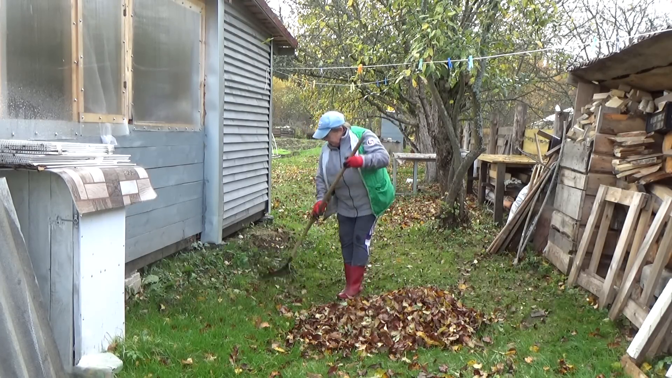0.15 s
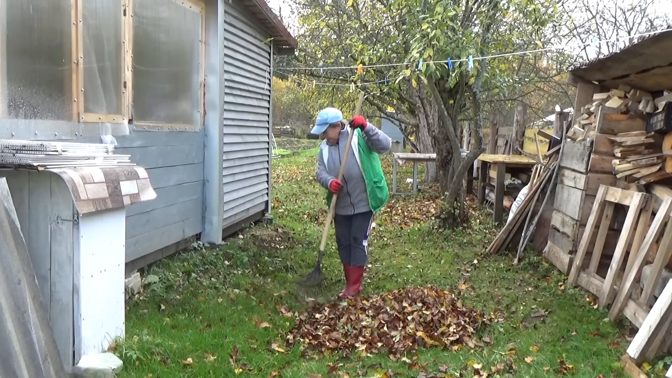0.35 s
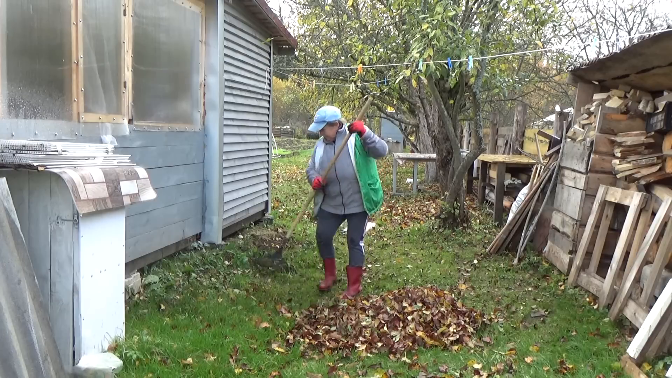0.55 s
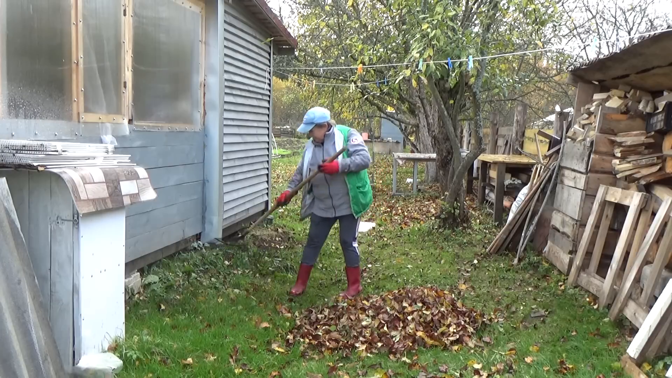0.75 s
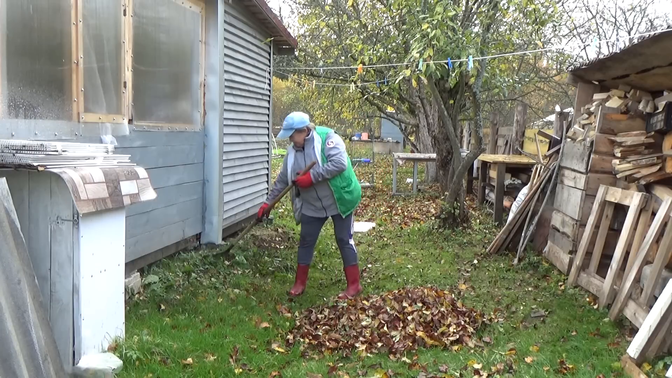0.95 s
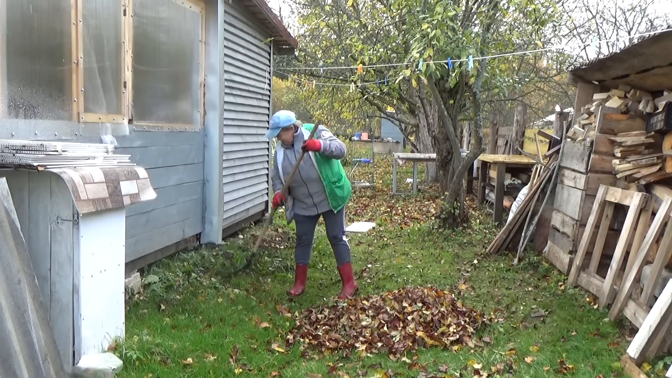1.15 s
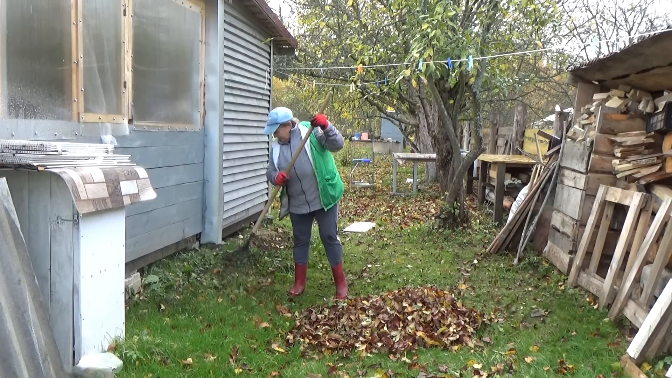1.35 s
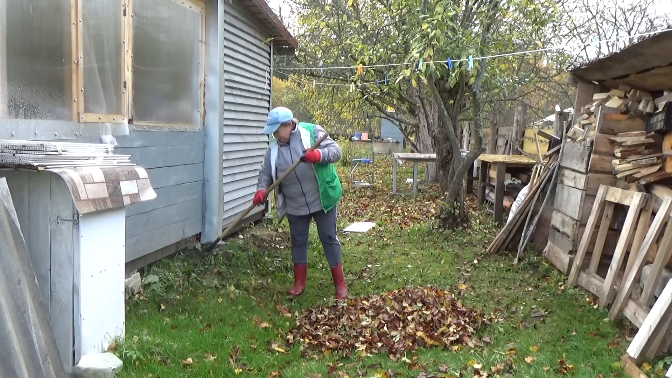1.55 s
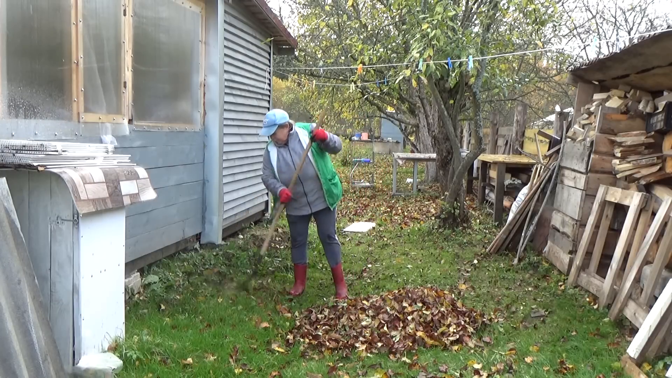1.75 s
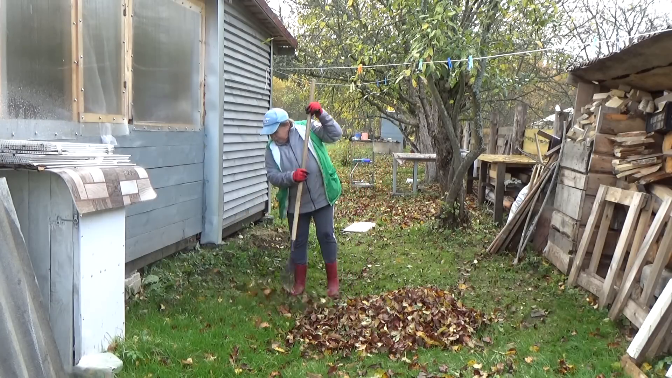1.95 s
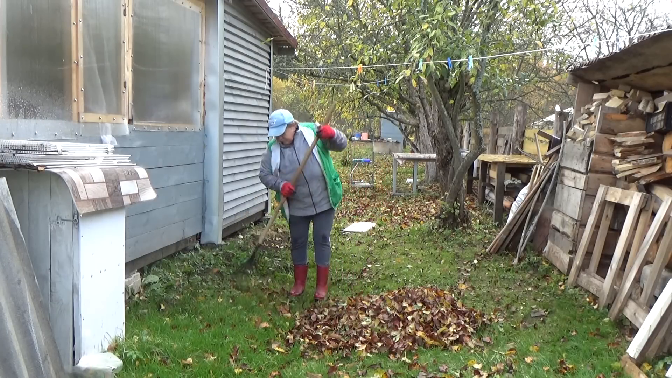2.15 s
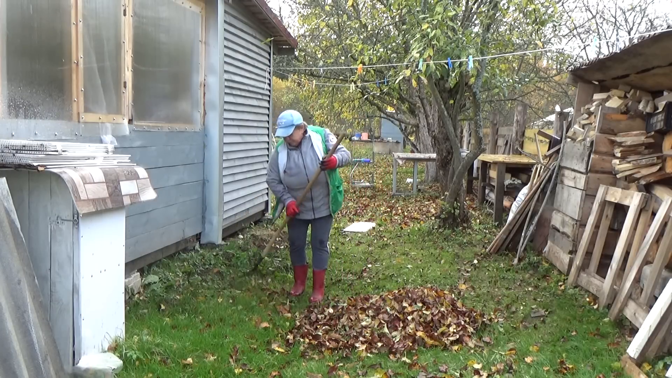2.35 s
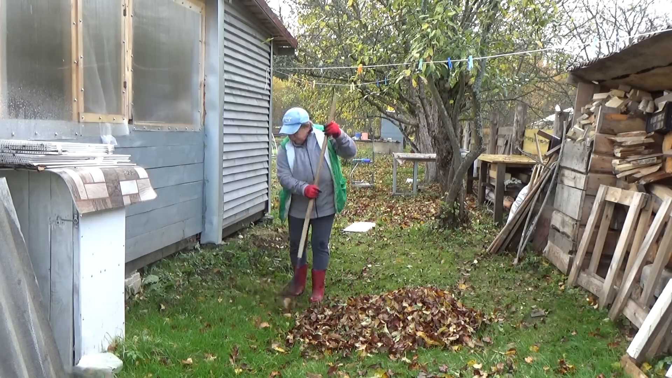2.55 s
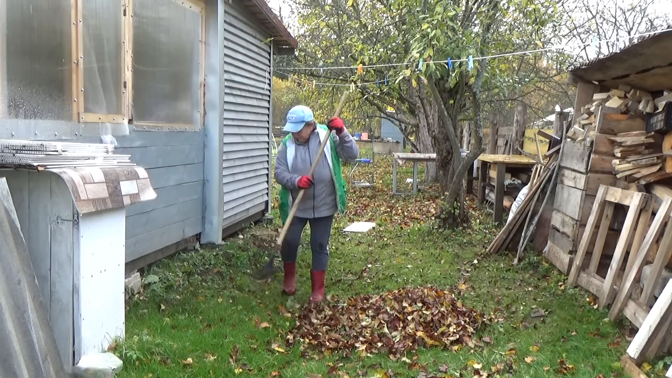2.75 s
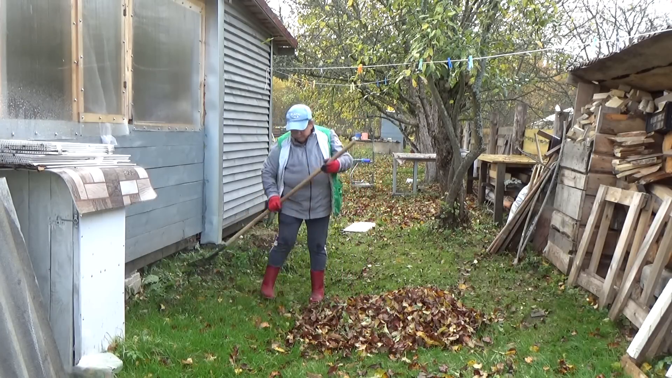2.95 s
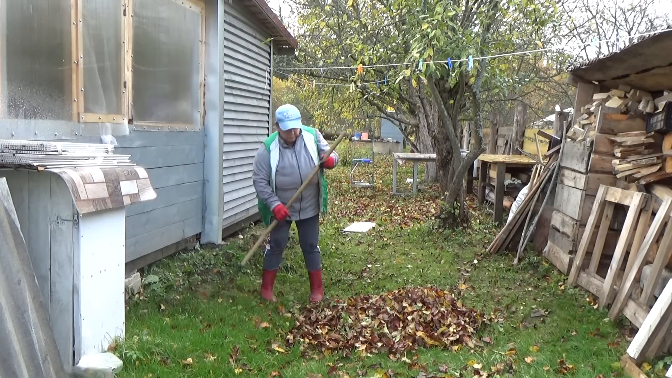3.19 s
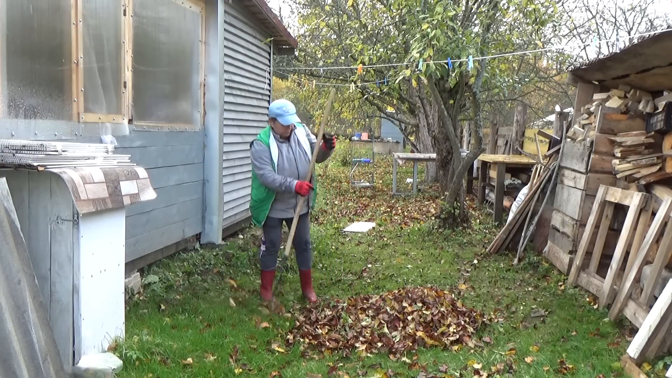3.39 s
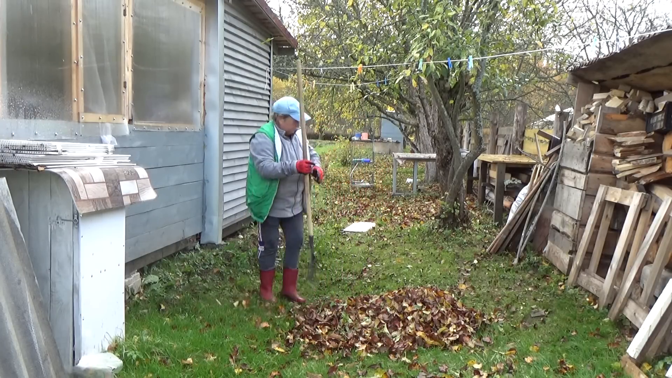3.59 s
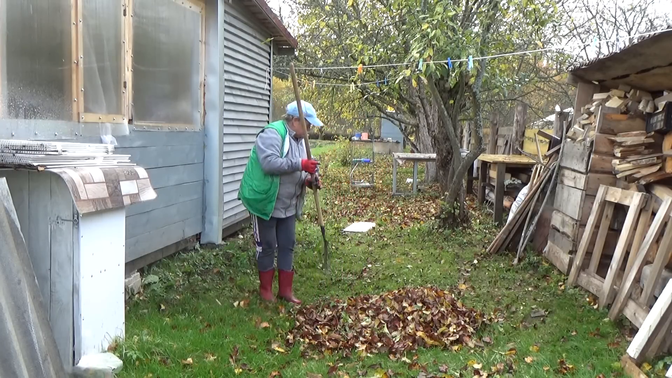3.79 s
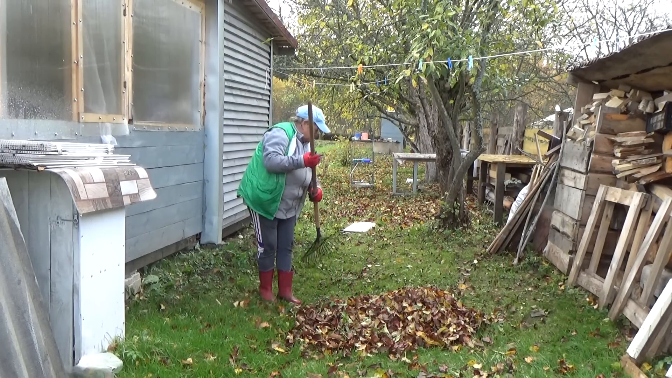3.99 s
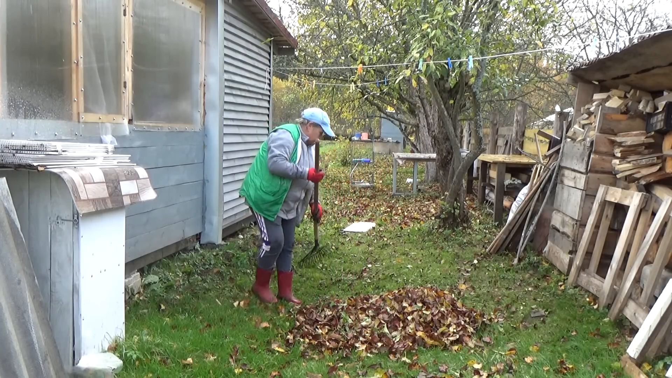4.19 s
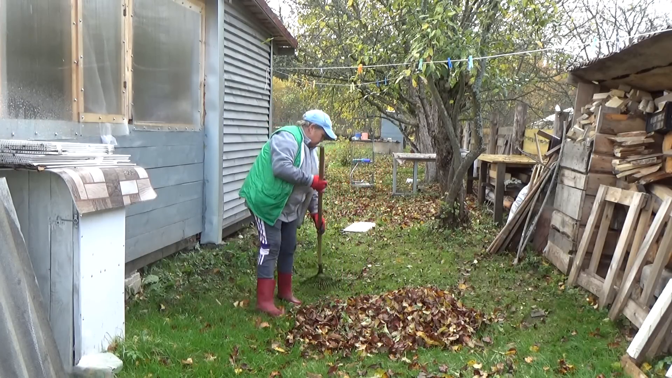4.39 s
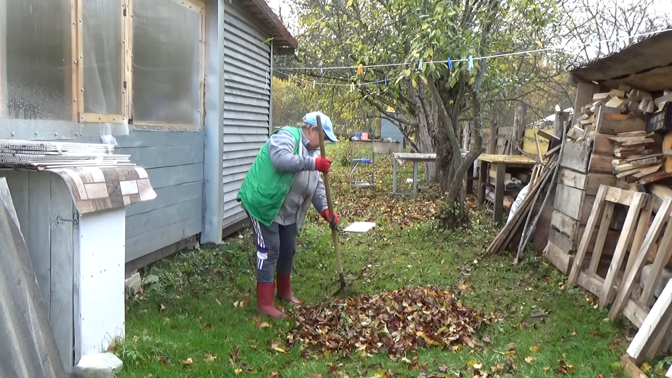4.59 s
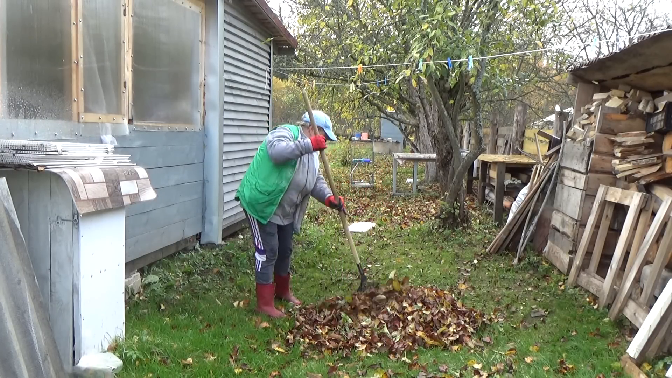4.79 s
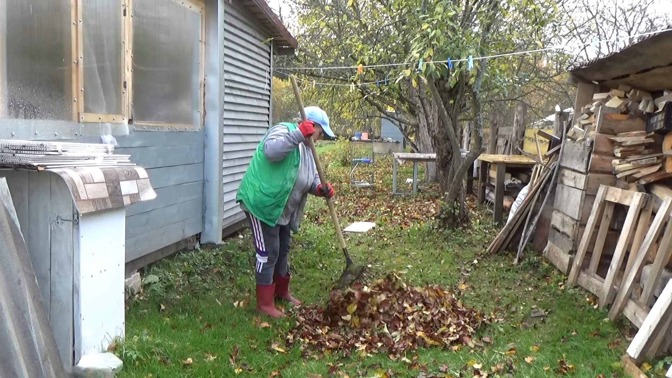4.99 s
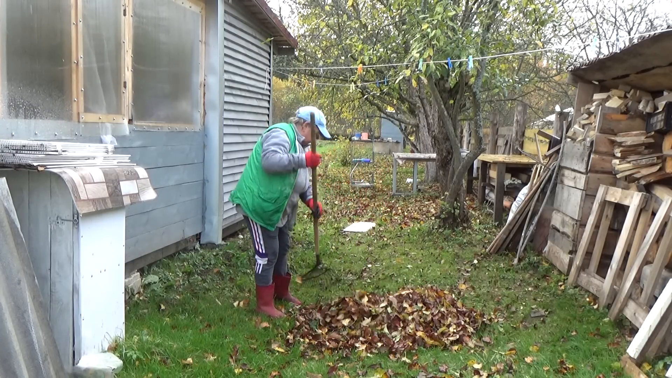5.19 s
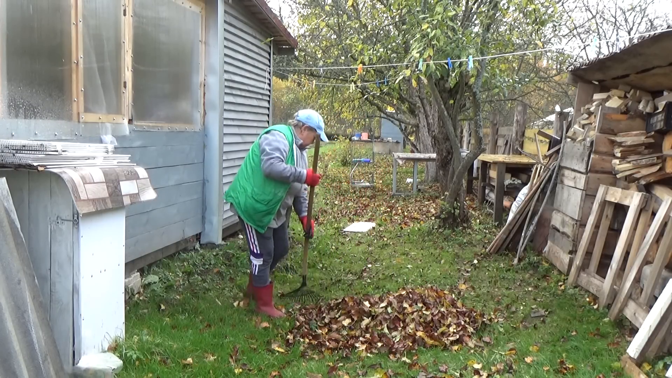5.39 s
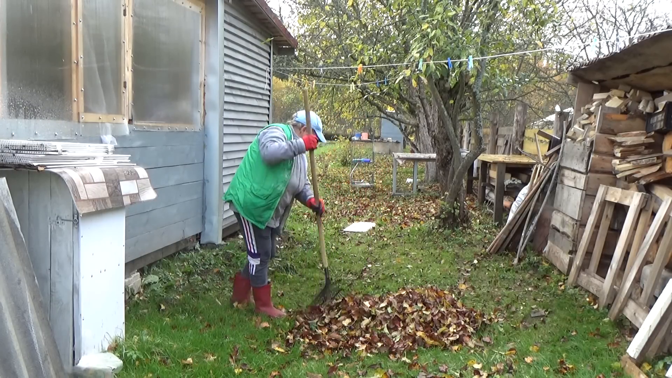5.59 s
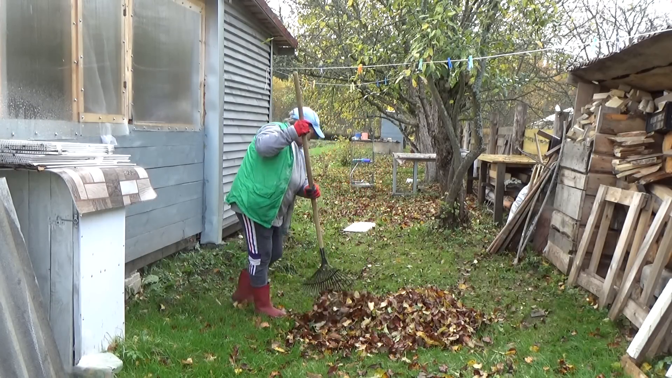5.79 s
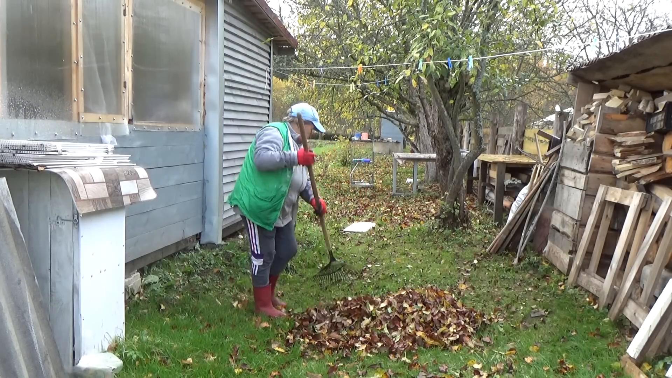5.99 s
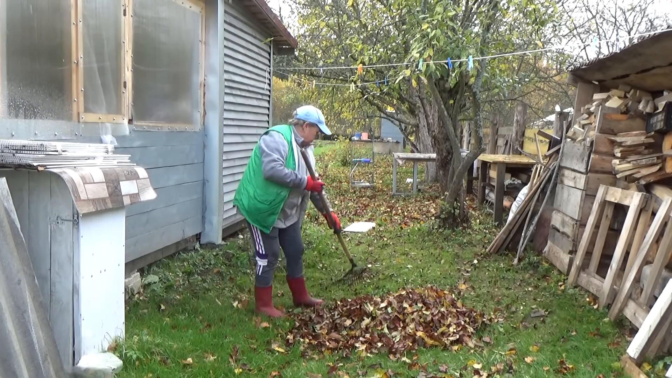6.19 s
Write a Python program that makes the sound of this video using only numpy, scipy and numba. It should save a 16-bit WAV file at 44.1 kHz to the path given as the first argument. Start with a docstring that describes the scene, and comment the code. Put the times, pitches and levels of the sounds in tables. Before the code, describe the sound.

A very faint, steady outdoor hush underlies close, dry raking, with a slight short echo from nearby wall and wood. At about 0.1 s the loudest stroke swells and rips through crisp leaves, tines rasping upward in pitch with a clack at 0.2. Small brushes and dull knocks follow. Softer pulls come at 1.0, 1.7, 2.4 and 3.15 s, each a quick crackling scrape with grass tearing beneath; springy tine rings flick out around 1.3 and 1.7, and a sharp clack with a soil thud lands at 1.7. From 3.5 to 4.2 only faint rustles and settling ticks remain. At 4.45 a longer scrape builds, with hard clacks around 4.6 and muffled leaf crunch onto a heap. Light rustling continues near 5.0, then an abrupt last pull at 5.4 clatters and crunches, fading into a soft brush by 6.0.

```python
"""Under faint outdoor air a fan rake takes a first, loudest pull through dry leaves and grass near a wall and woodpile.
Four more pulls follow at short intervals, with light brushes over the lawn and dull knocks of boots and rake between.
After a longer gap come the last two pulls, around which leaves crunch onto a heap.
The leaves are trains of tiny snaps, the turf a bumpy crackle; bending tines are gliding resonances, mostly rising.
Short volleys of clicks make the tines clack as they land, and ringing bursts as they spring free."""
import sys
import numpy as np
from scipy import signal
from scipy.fft import rfft, irfft, next_fast_len
from scipy.io import wavfile
from scipy.ndimage import map_coordinates
from numba import njit

SR = 44100
rng = np.random.default_rng(int(sys.argv[2]) if len(sys.argv) > 2 else 0)


def digitize_waveform(pressure):
    """Quantize a signal to 16-bit integers and store it at the path in sys.argv[1].

    Rows of a 2-D input are taken as channels; values are limited to [-1, 1].
    """
    field = np.atleast_2d(pressure).T
    bounded = np.clip(field, -1, 1)
    quanta = np.round(bounded * 32767).astype(np.int16)
    wavfile.write(sys.argv[1], SR, quanta)


N = 275184

# Colour of dry leaves. Each row: frequency in Hz, relative level in dB.
LEAF_COLOUR = [(300, -41), (900, -13), (1600, -6.5), (2400, -3.5), (3500, -1.5), (5000, 0), (6300, 0),
               (7400, -3), (9800, -3.5), (12000, -9), (14000, -16), (16000, -24)]


def amp(db):
    """Decibels to gain."""
    return 10 ** (np.asarray(db) / 20)


def unit(x):
    """Scaled to rms 1."""
    return x / np.sqrt(np.mean(x ** 2) + 1e-20)


def along(points, hz):
    """(Hz, value) points read on a log frequency axis."""
    point_hz, values = np.transpose(points)
    return np.interp(np.log(hz + 1), np.log(point_hz + 1), values)


def wobble(rate):
    """A smooth random curve, rate knots a second."""
    knots = rng.standard_normal(int(N * rate / SR) + 4)
    return map_coordinates(knots, [np.arange(N) * rate / SR])


def filtered(x, response):
    """The signal multiplied by a response of frequency."""
    m = next_fast_len(N + SR // 2)
    return irfft(rfft(x, m) * response(np.fft.rfftfreq(m, 1 / SR)), m)[..., :N]


def coloured(x, spectrum):
    """The signal through a (Hz, dB) spectrum that keeps the power of white noise."""
    return filtered(x, lambda hz: unit(amp(along(spectrum, hz))))


def stereo(pair, alike):
    """Two independent signals become left and right, as alike in each band as the (Hz, likeness) points say."""
    def mid_and_side_gains(hz):
        turn = np.arccos(np.clip(along(alike, hz), -1, 1)) / 2
        return np.array([np.cos(turn), np.sin(turn)])

    mid, side = filtered(pair, mid_and_side_gains)
    return np.array([mid + side, mid - side])


def scattered(x, life=.002, block=512):
    """Each snap arrives by many short paths through the litter, life seconds long; the paths keep changing."""
    count = N // block + 1
    pieces = np.pad(x, ((0, 0), (0, count * block - N))).reshape(2, count, block)
    paths = rng.standard_normal((2, count, block)) * np.exp(-np.arange(block) / (SR * life))
    gains = rfft(paths, 2 * block)
    # only the phase of the paths is used, so they smear without colouring
    heard = irfft(rfft(pieces, 2 * block) * gains / np.abs(gains)).reshape(2, count, 2, block)
    head = heard[:, :, 0].reshape(2, -1)
    tail = heard[:, :, 1].reshape(2, -1)
    # the tail of each block overlaps the next block
    return (head + np.pad(tail, ((0, 0), (block, 0)))[:, :-block])[:, :N]


def crackle(rate, spread_db, hiss):
    """Two trains of tiny snaps of uneven size, rate a second, merged with a hiss; rms 1."""
    sizes = amp(spread_db * np.clip(rng.standard_normal((2, N)), -2, 2))
    sizes = sizes * rng.choice([-1, 1], (2, N))
    snaps = sizes * (rng.random((2, N)) < rate / SR) / np.sqrt(rate)
    return unit(unit(scattered(snaps)) + hiss * rng.standard_normal((2, N)))


def snags(rate, life, size):
    """A tine catches, lets go and the leaves settle: random jumps that die away, over a steady level; mean 1."""
    kicks = (rng.random(N) < rate / SR) * rng.uniform(0.18, 1, N)
    jumps = signal.lfilter([1], [1, -np.exp(-1 / (SR * life))], kicks)
    return (1 + size * jumps) / (1 + size * jumps.mean())


def bursts(times, levels_db, hold, t60):
    """An envelope that jumps at each time, holds while the tines arrive, and dies by 60 dB in t60 seconds."""
    out, t = np.zeros(N + SR), np.arange(SR // 4) / SR
    for start, db in zip(times, levels_db):
        out[round(start * SR):][:len(t)] += amp(db - 60 * np.maximum(t - hold, 0) / t60)
    return out[:N]


def swell(start, attack, hold, fall_db_per_s):
    """Pressure builds a little faster than linearly, holds and lets go; top 1."""
    attack_power = 1.17
    t = np.arange(N) / SR - start
    build = np.clip(t / attack, 0, 1) ** attack_power
    return build * amp(-fall_db_per_s * np.maximum(t - attack - hold, 0))


def air():
    """Faint, nearly steady outdoor hush: coloured noise."""
    # Colour of the hush. Each row: frequency in Hz, relative level in dB.
    hush_colour = [(20, -4.5), (35, -9), (50, -5.5), (75, -2), (150, -4.5), (400, -3.5), (1000, -2.5),
                   (3000, -5.5), (6000, -10), (10000, -11), (13000, -19), (16000, -20)]
    level_db = -68.0 + 0.16 * wobble(1.77)
    return amp(level_db) * coloured(rng.standard_normal((2, N)), hush_colour)


def yard(x):
    """Wall and woodpile scatter a short answer: a noise tail that dies at its own pace in each band."""
    # Decay of the answer. Each row: frequency in Hz, time to fall 60 dB in seconds.
    decay_times = [(150, 0.33), (2000, 0.12), (12000, 0.096)]
    hz, t, noise = signal.stft(rng.standard_normal(SR // 3), SR, nperseg=256)
    fade = amp(-60 * t / along(decay_times, hz)[:, None])
    tail = signal.istft(noise * fade, SR, nperseg=256)[1]
    tail = np.pad(tail / np.linalg.norm(tail), (SR // 200, 0))  # 5 ms later than the rake
    return signal.fftconvolve(x, tail[None], axes=1)[:, :N]


def knocks():
    """Boots and rake knock dully on the soil, which swallows each knock within a few cycles."""
    # Knocks on soft ground. Each row: start in seconds, pitch in Hz, envelope peak in dB.
    soil_knocks = [(0.065, 1400, -49.5), (.272, 85, -61), (0.768, 342, -58), (0.788, 1900, -54),
                   (1.713, 390, -48), (2.549, 430, -49.5), (4.705, 520, -46), (3.04, 45.3, -76),
                   (5.569, 90, -61)]
    out, t = np.zeros(N + SR), np.arange(SR // 4) / SR
    for start, hz, db in soil_knocks:
        life = 0.0011 + 1.1 / hz
        age = 2 * t / life
        out[round(start * SR):][:len(t)] += amp(db) * np.sin(2 * np.pi * hz * t) * age * np.exp(1 - age)
    return out[:N]


def flicks():
    """A snagged tine lets go and rings briefly: short snaps excite the tine resonances."""
    # Tines springing free. Each row: start in seconds, relative level in dB.
    releases = [(0.5935, -57), (0.6334, -47.5), (0.8372, -54.5), (0.985, -50), (1.32, -32.5), (1.3517, -39),
                (1.3754, -45), (1.518, -55), (1.682, -31.5), (2.0488, -46.5), (2.174, -50), (2.646, -44),
                (2.7831, -54), (3.8023, -65)]
    # Ring of the plastic tines. Each row: frequency in Hz, width in Hz, relative level in dB.
    tine_modes = [(3920, 250, 1.5), (4270, 640, 3.5), (5140, 200, -4), (6220, 260, 3.5), (7130, 200, -21),
                  (10000, 1800, -6)]
    start, db = np.transpose(releases)
    snaps = bursts(start, db - 12.0, hold=0.0025, t60=0.054) * crackle(2200, spread_db=4, hiss=.9)

    def ring(hz):
        return sum(amp(level) * 1j * hz * width / (centre ** 2 - hz ** 2 + 1j * hz * width)
                   for centre, width, level in tine_modes)

    return amp(8.0) * filtered(snaps, ring) + amp(-21) * coloured(snaps, LEAF_COLOUR)


def clacks():
    """The fan of tines lands as a tight volley of clicks that also shakes the rake head."""
    # Strikes on the ground or a twig. Each row: start in seconds, relative click level in dB,
    # level of the head's body over the click in dB before trim.
    strikes = [(0.204, -25, -27), (0.497, -38, -13.5), (0.9332, -45, -2), (1.6392, -44, -20),
               (1.713, -23, -11), (2.357, -41, -8), (2.397, -37, -29), (2.4234, -36, -27),
               (3.1667, -37, -25), (3.476, -37, -25), (4.5294, -30, -14), (4.6, -20.5, -27),
               (4.6794, -25.5, -32), (5.3863, -39.5, -4.5), (5.4385, -28.5, -9), (5.5514, -30, -25)]
    # Colour of the rake head. Each row: frequency in Hz, relative level in dB.
    head_colour = [(100, -24), (350, -25), (900, 8), (1600, 15), (2500, 16.5), (4000, 12), (9000, -13)]
    start, db, body_db = np.transpose(strikes)
    clicks = bursts(start, db - 16.5, hold=0.0067, t60=0.021) * crackle(2500, spread_db=7.5, hiss=0.98)
    body = bursts(start, db + body_db - 9, hold=0.0031, t60=0.069) * crackle(2000, spread_db=7.5, hiss=0.28)
    return coloured(clicks, LEAF_COLOUR) + coloured(body, head_colour)


@njit
def resonate(x, pole):
    """A resonance whose complex pole moves from sample to sample."""
    out, state = np.zeros(len(x)), 0j
    for i in range(len(x)):
        state = state * pole[i] + x[i]
        out[i] = state.real
    return out


def chatter(q=3.6):
    """Tines stick and slip; as the pull bends them against the ground their ring glides, mostly upward."""
    # Bouts of chatter. Each row: moment of full force in seconds, rise in seconds, fall in seconds,
    # relaxed pitch in Hz, bent pitch in Hz, relative level in dB.
    bouts = [(.12, .035, .06, 1150, 1350, -57), (.207, .09, 0.044, 1750, 4000, -39),
             (.244, 0.025, 0.02, 4200, 5400, -33), (1.17, 0.11, 0.074, 2060, 3870, -38),
             (1.215, .045, 0.048, 4600, 5400, -44), (1.72, .012, 0.084, 3300, 4730, -46),
             (2.43, 0.057, 0.036, 2790, 4200, -45), (3.215, .07, .07, 4500, 5700, -47),
             (4.0, .12, 0.14, 2900, 3020, -62), (4.335, 0.075, 0.14, 4850, 5900, -54),
             (4.48, .05, .06, 1100, 1400, -60), (4.535, .1, .09, 1900, 2300, -52.5),
             (4.606, .025, 0.035, 2000, 2500, -34.5), (4.685, 0.051, 0.042, 2700, 3270, -40),
             (5.444, 0.0073, .045, 2520, 2420, -36), (5.48, .025, 0.076, 2050, 2240, -44.5),
             (5.532, 0.064, 0.047, 2310, 3400, -41.5)]
    fall_range_db = 21.5  # loss over one fall time
    bend_share = 0.16  # pace of the pitch glide, as a share of the bout
    force_power = 1.4  # the chatter grows faster than the bend
    out, t = np.zeros((2, N)), np.arange(N) / SR
    slips = crackle(1500, spread_db=0.5, hiss=0.49) * snags(rate=68, life=0.0027, size=1.1)
    slips = filtered(slips, lambda hz: hz ** 2 / (hz ** 2 + 900 ** 2))  # thin the lows
    for peak, rise, fall, relaxed_hz, bent_hz, db in bouts:
        on = (t > peak - rise) & (t < peak + 2 * fall)
        since = t[on] - peak
        force = np.clip(1 + since / rise, 0, 1) ** force_power
        force = force * amp(db - fall_range_db * np.maximum(since, 0) / fall)
        bend = .5 + .5 * np.tanh(.5 * since / (bend_share * (rise + fall)))
        pitch_hz = relaxed_hz * (bent_hz / relaxed_hz) ** bend
        radius = np.exp(-np.pi * pitch_hz / (q * SR))
        pole = radius * np.exp(2j * np.pi * pitch_hz / SR)
        drive = slips[:, on] * force * np.sqrt(2 * (1 - radius ** 2))  # even loudness at any pitch
        out[:, on] += [resonate(x, pole) for x in np.ascontiguousarray(drive)]
    return out


def heap():
    """The deep heap muffles its own crunch as leaves are shoved onto it around the last two pulls."""
    # Shoves onto the heap. Each row: start in seconds, attack in seconds, hold in seconds,
    # fall in dB per second, level in dB.
    heap_shoves = [(4.424, .05, .14, 100, -59), (4.61, 0.084, .03, 60, -48),
                   (4.994, 0.049, 0.17, 86.5, -64), (5.525, 0.027, 0.039, 100, -49)]
    # Colour of the muffled crunch. Each row: frequency in Hz, relative level in dB.
    muffled_colour = [(100, -22), (230, -6), (450, -6), (700, -0.5), (1200, -7.5), (2100, 0), (3000, 0.5),
                      (4500, -7), (8000, -15), (14000, -37)]
    power = sum((amp(db) * swell(start, attack, hold, fall)) ** 2
                for start, attack, hold, fall, db in heap_shoves)
    crunch = crackle(1200, spread_db=4.5, hiss=0.45) * snags(rate=42, life=0.012, size=.8)
    return np.sqrt(power) * coloured(crunch, muffled_colour)


def raking():
    """All strokes summed in power: rustle level, turf drag level and crispness over time, in dB."""
    # Pulls of the rake. Each row: start in seconds, attack in seconds, hold in seconds,
    # fall in dB per second, relative rustle level in dB, turf drag over the rustle in dB before trim,
    # crispness in dB before dulling.
    pulls = [(0.081, 0.15, 0.036, 131, -38.5, -13, -1), (1.015, 0.11, 0.089, 114, -43, -12, 2),
             (1.661, 0.092, 0.092, 158, -42.5, -12, 1), (2.366, 0.077, 0.13, 147, -45, -13, 1),
             (3.151, 0.043, 0.071, 89, -47, -15, 1.5), (4.46, 0.19, 0.037, 64, -46, -9, -4),
             (5.43, 0.012, 0.12, 79, -47, -12, 0)]
    # Light brushes of rake and boots over the lawn between pulls. Each row: same columns as the pulls.
    brushes = [(0.0, 0.0028, 0.052, 150, -66.5, -5.5, 3), (.46, 0.037, 0.12, 150, -67, -9, -5),
               (.88, 0.021, .02, 100, -67, -15, 0), (.925, 0.021, 0.051, 112, -63.5, -10, 2),
               (1.626, 0.015, 0.0059, 300, -60, -6, 0), (1.9, .03, 0.062, 68, -58.5, -11, -6),
               (2.14, 0.057, 0.045, 150, -58.5, -10.5, 1), (2.74, .03, .19, 100, -69.5, -5.5, 0),
               (2.98, 0.027, 0.0091, 203, -62, -7, 1), (3.49, 0.021, .15, 200, -67.5, -11, 0),
               (3.788, .014, 0.013, 200, -65.5, -16, 1), (3.86, .15, .11, 300, -59, -24, 4),
               (4.185, 0.028, 0.017, 150, -69, -11, 2), (4.272, 0.053, 0.014, 90, -55.5, -16, 6),
               (4.405, .03, .08, 100, -56.5, -14, 0), (4.95, 0.1, 0.14, 49.4, -58.5, -11.5, -3),
               (5.378, 0.0092, .022, 200, -59.5, -8, 4), (5.79, 0.086, .215, 130, -65.5, -11.5, -3)]
    settle_db, settle_db_per_s = -18, 29.5  # stirred leaves go on ticking after the rake has passed
    dull_db_per_s = 10  # the crispest leaves break first
    sink_s = 0.022  # the tines reach the turf a little after the leaves
    t = np.arange(N) / SR
    rustle, drag, crisp = np.full((3, N), 1e-10)  # power floor
    for start, attack, hold, fall, db, drag_db, crisp_db in pulls + brushes:
        settling = amp(settle_db) * swell(start, attack, hold, settle_db_per_s)
        stroke = np.maximum(swell(start, attack, hold, fall), settling)
        dull_db = dull_db_per_s * np.clip(t - start, 0, 2 * (attack + hold))
        sunk = np.clip((t - start) / (attack + sink_s), 0, 1) ** .5
        rustle += (stroke * amp(db)) ** 2
        drag += (stroke * sunk * amp(db + drag_db)) ** 2
        crisp += (stroke * amp(db + crisp_db - dull_db)) ** 2
    return 10 * np.log10([rustle, drag, crisp / rustle])


def stalks(level_db, rate, centre_hz, spread, cycles):
    """Single stalks break, rate a second, each with a short ring at its own pitch; they follow the raking level."""
    range_db = 15  # loudest to faintest stalk
    size = round(rate * N / SR)
    when, pitch, strength, phase = rng.random((size, 4)).T
    first = (when * (N - 1)).astype(int)
    hz = np.clip(centre_hz * (pitch / (1 - pitch)) ** spread, 200, 12000)
    t = np.arange(SR // 30) / SR
    age = t * hz[:, None] / cycles
    rings = np.sin(2 * np.pi * (hz[:, None] * t + phase[:, None])) * np.exp(-age) * (1 - np.exp(-6 * age))
    gains = amp(level_db[first] - range_db * np.sqrt(strength))
    places = first[:, None] + np.arange(len(t))
    return np.bincount(places.ravel(), (gains[:, None] * rings).ravel(), N)[:N]


def turf(drag_db):
    """The tines tear through grass and bump over the soil."""
    # Colour of the turf. Each row: frequency in Hz, relative level in dB.
    turf_colour = [(25, -28), (60, -17), (95, -6), (135, -13), (190, 0.5), (260, -4), (400, 2), (500, 2),
                   (750, 2.5), (1200, 0), (2200, -0.5), (4000, 0), (9000, -37)]
    bumps = unit(amp(1.5 * wobble(70)))
    tearing = coloured(crackle(1500, spread_db=1.5, hiss=0.63), turf_colour)
    return amp(drag_db + 3.5) * bumps * tearing


def leaves(rustle_db, crisp_db):
    """The harder dry leaves are pushed, the denser and more jerky their snaps. Crisp ones sizzle on top."""
    push = amp(.3 * (rustle_db + 45))
    snaps = crackle(2200 * push, spread_db=2.0, hiss=0.49) * snags(rate=77, life=0.0076, size=0.37 * push)
    rustle = coloured(snaps, LEAF_COLOUR)
    sizzle = filtered(rustle, lambda hz: 1 / (1 + (10800 / (hz + 1)) ** 12))  # the top above 10.8 kHz
    return amp(rustle_db + 1.5) * (rustle + sizzle * (amp(crisp_db) - 1))


def scene():
    """The rake works near the middle; its echo and the air come from all around."""
    # Width of the rake. Each row: frequency in Hz, left-right likeness from 0 to 1.
    rake_alike = [(100, 1), (500, 1), (1500, 0.99), (3200, 0.91), (5500, 0.98), (8000, 0.87), (9000, 0.97),
                  (9800, 1)]
    # Width of the echo and air. Each row: frequency in Hz, left-right likeness from 0 to 1.
    air_alike = [(40, .99), (120, 0.95), (300, 0.66), (900, 0.28), (2000, 0.64), (4000, 0.63), (6000, 0.87),
                 (8500, .88), (9800, 1)]
    rustle_db, drag_db, crisp_db = raking()
    dry_stalks = stalks(rustle_db + 5, rate=200, centre_hz=3500, spread=.27, cycles=10)
    damp_stalks = stalks(drag_db + 4, rate=110, centre_hz=750, spread=.26, cycles=4.1)
    litter = leaves(rustle_db, crisp_db) + turf(drag_db) + dry_stalks + damp_stalks + heap()
    rake = litter + chatter() + clacks() + flicks()
    around = amp(-13.5) * yard(rake) + air()
    balance = amp([[-.2], [.2]])  # a touch to the right
    return stereo(rake, rake_alike) * balance + stereo(around, air_alike) + knocks()


def record(dry):
    """Everything above the band limit of 15.8 kHz is cut."""
    return filtered(dry, lambda hz: hz < 15800)


dry = scene()
out = record(dry)
digitize_waveform(out)
```